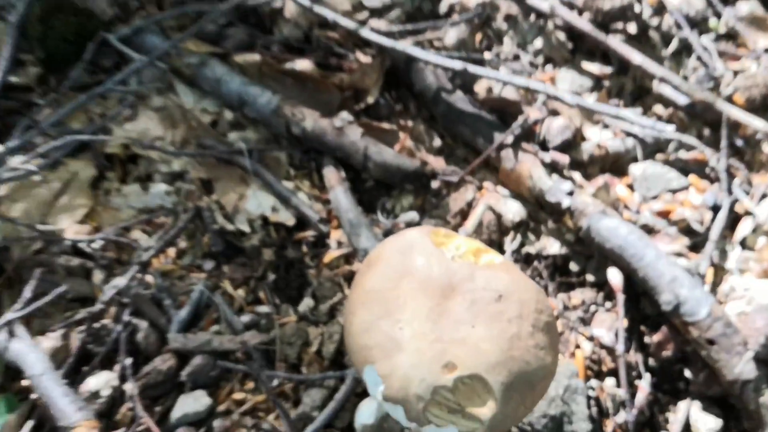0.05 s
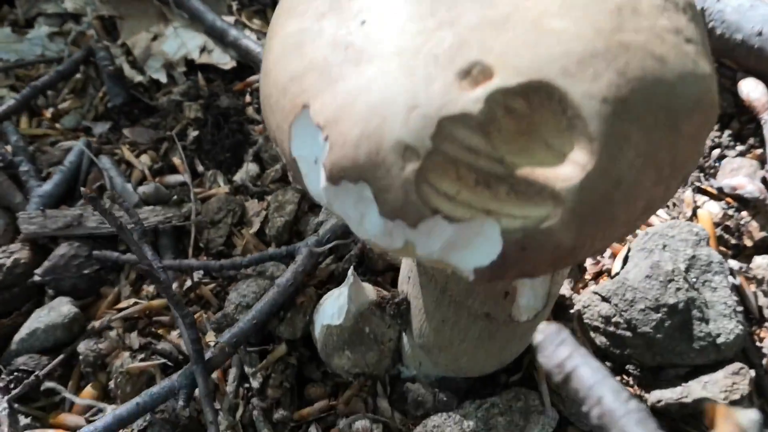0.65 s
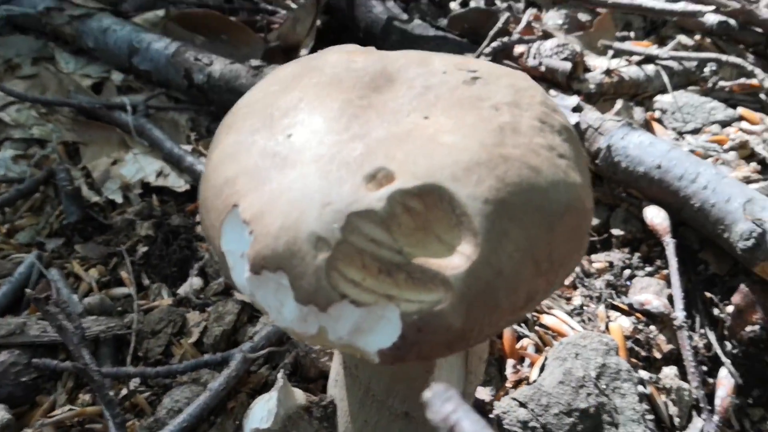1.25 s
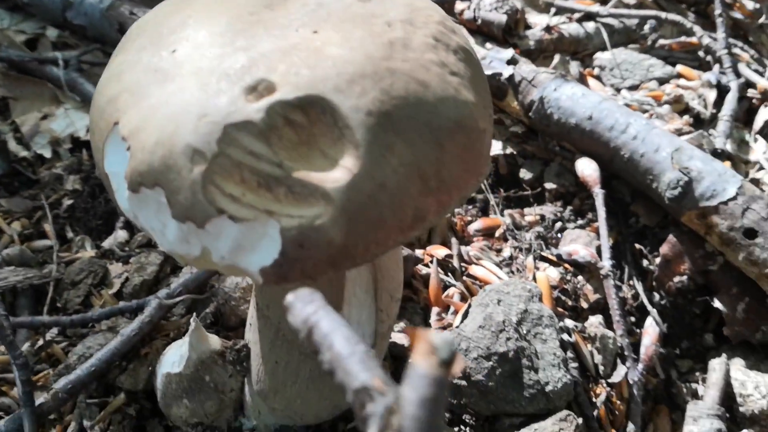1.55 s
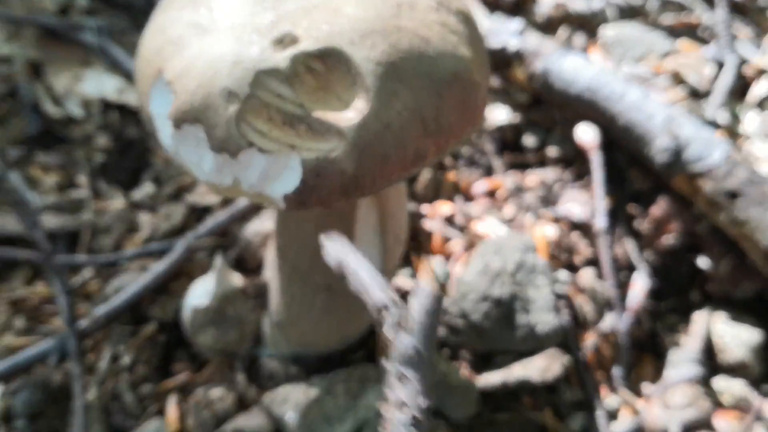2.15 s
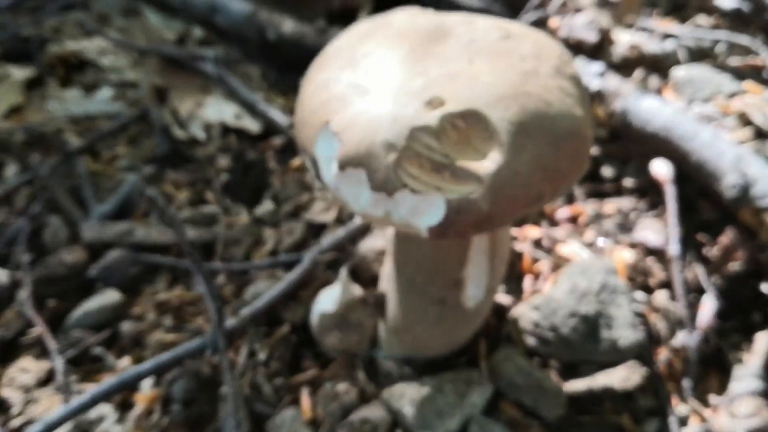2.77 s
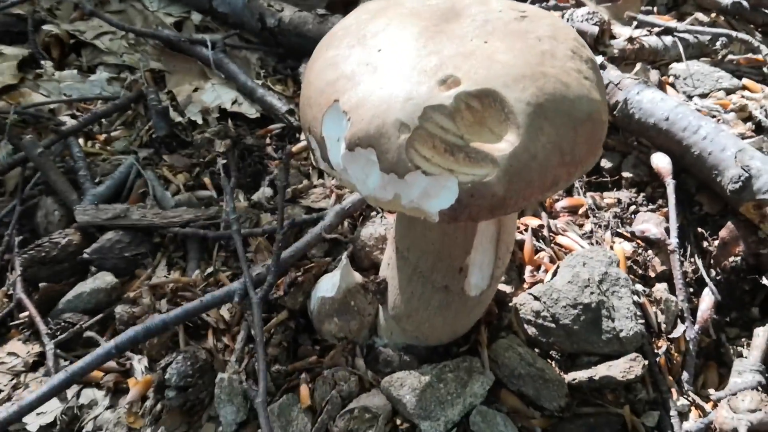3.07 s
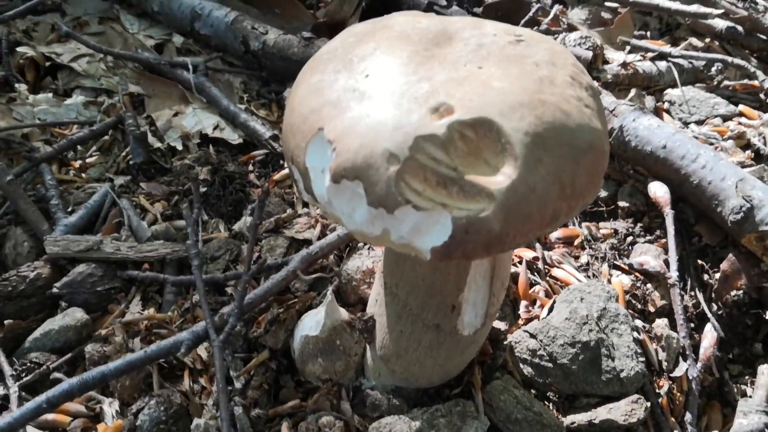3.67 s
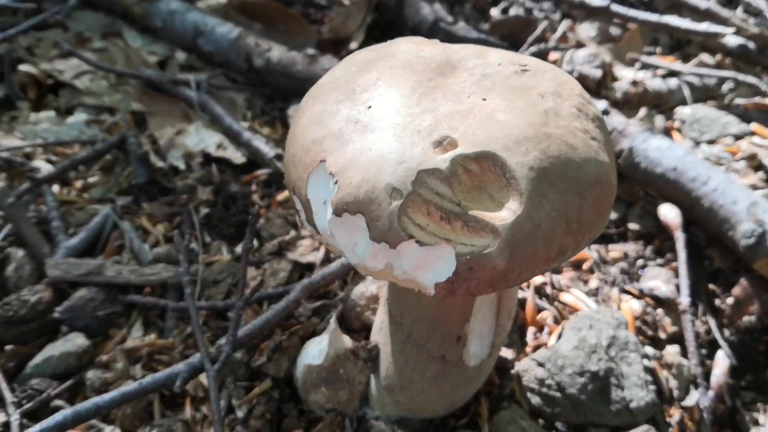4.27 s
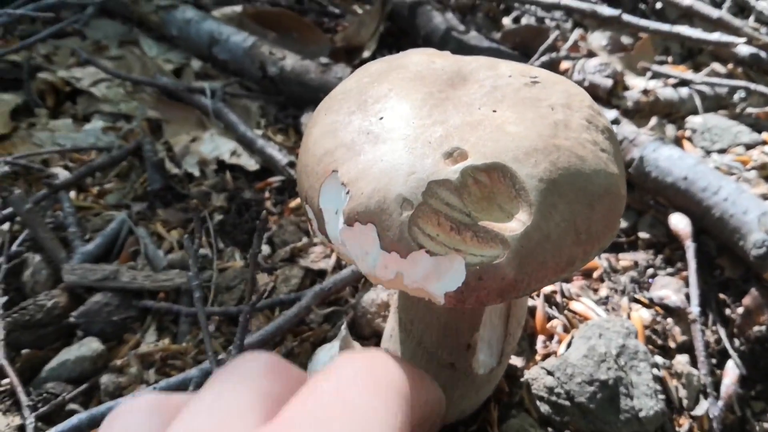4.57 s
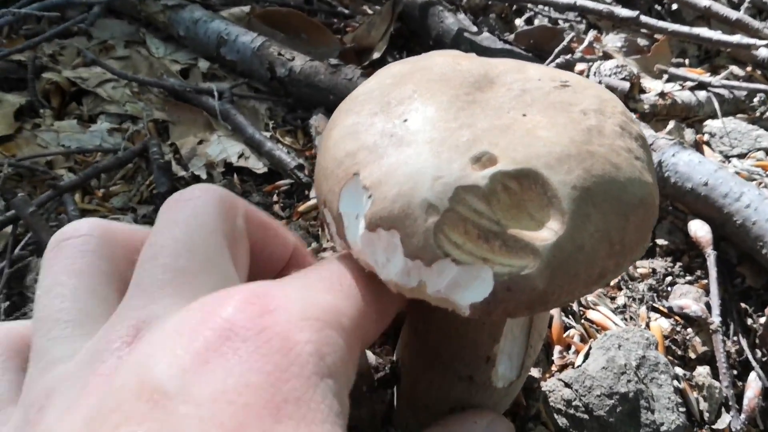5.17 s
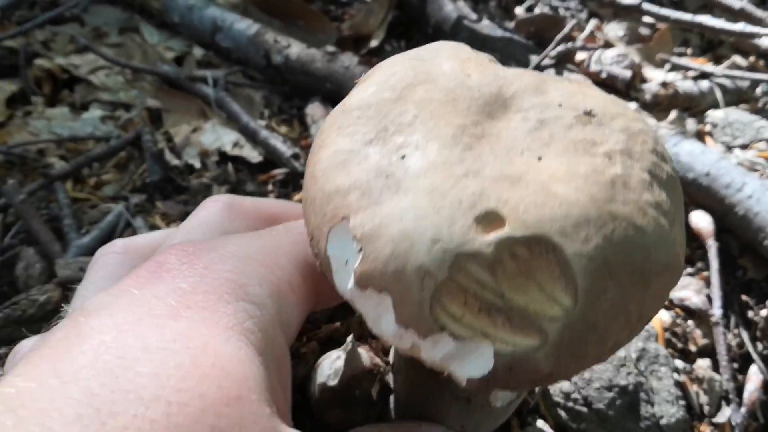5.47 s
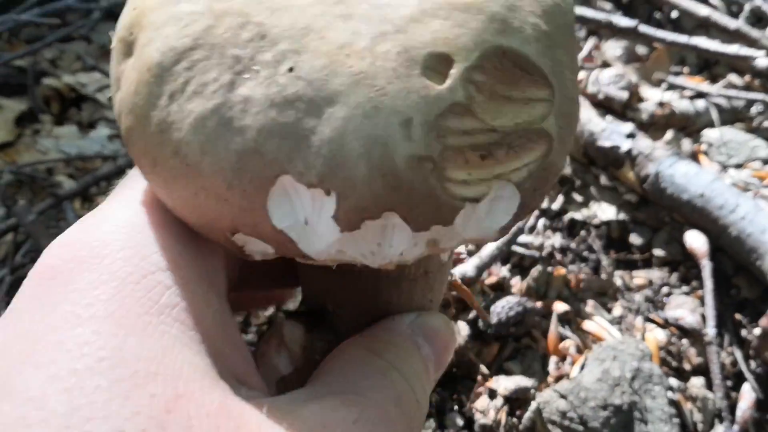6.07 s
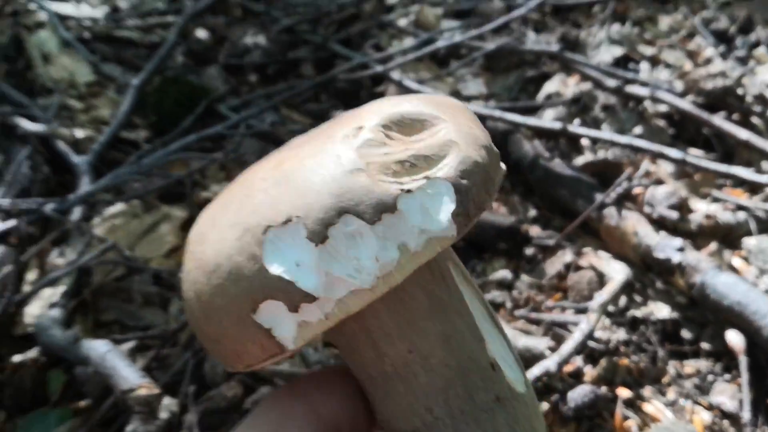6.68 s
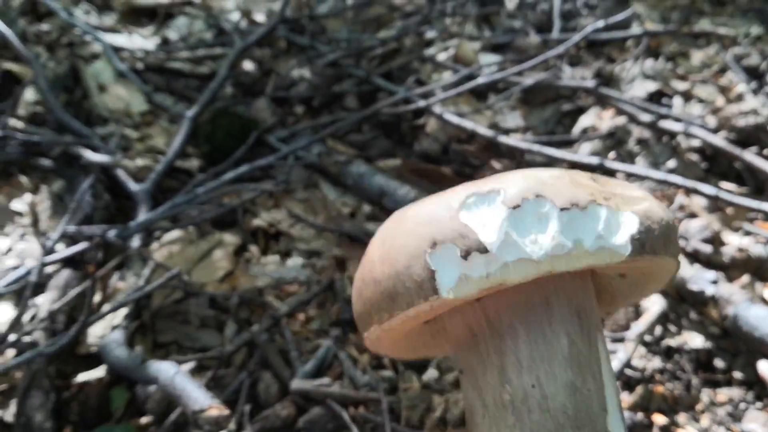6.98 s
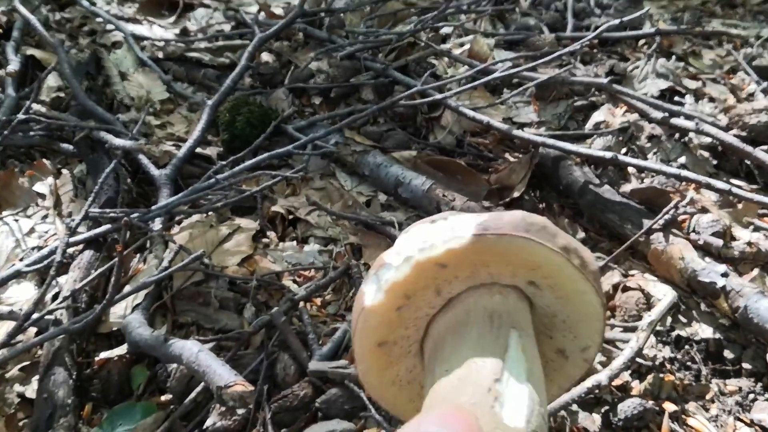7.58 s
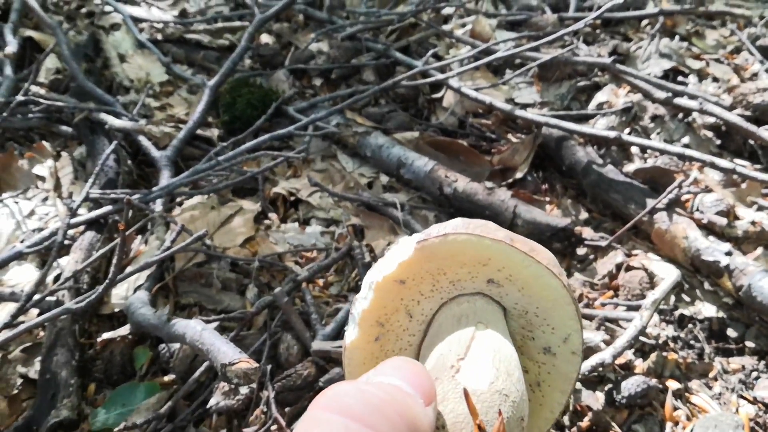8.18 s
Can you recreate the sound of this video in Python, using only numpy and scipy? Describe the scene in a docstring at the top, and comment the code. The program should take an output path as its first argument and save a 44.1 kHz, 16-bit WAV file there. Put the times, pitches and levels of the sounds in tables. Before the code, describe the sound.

A loud, close crunch of dry twigs and dead leaves starts at once and lasts until about 0.6 seconds, full of sharp snaps and dull soil thuds as someone shifts their weight. It dies down, with a brief cluster of snaps on the left at 1.1 seconds, then a lull with tiny ticks. From about 2.6 seconds a brighter, leafy crackle builds slightly to the left, loudest between 2.8 and 3.4 seconds, with many wooden snaps and one soft thud. A smaller crunch follows at 3.8 seconds, then near quiet. From 5 to 6.2 seconds come softer crunches, snaps and low thuds as a mushroom is pulled from the ground. These thin out to stray ticks, with single small snaps near 6.6 and 7.2 seconds and very faint rustling until about 8.5 seconds. The faint, steady rush of a still wood lies behind throughout.

```python
"""Someone leans over a mushroom on a dry forest floor, moves a stick, shifts their weight and pulls it up.
First comes a loud crunch: twigs and dead leaves fail by brittle fracture, and the damped soil thuds.
After a lull a brighter crackle builds near 3 s, with snaps that ring the modes of wood and splinters.
Softer crunches and thuds follow from 5 to 6 s and thin out to stray ticks.
All of it is close by; throughout, the faint rush of a still wood lies behind."""
import sys
import numpy as np
from scipy import signal
from scipy.fft import rfft, irfft, next_fast_len
from scipy.io import wavfile
from scipy.ndimage import map_coordinates

SR = 44100
rng = np.random.default_rng(int(sys.argv[2]) if len(sys.argv) > 2 else 0)


def generate_wav(sig):
    """Save sig (samples, or channels by samples) to the path in sys.argv[1] as 16-bit PCM at SR."""
    pcm = np.round(np.clip(np.atleast_2d(sig).T, -1, 1) * 32767).astype(np.int16)
    wavfile.write(sys.argv[1], SR, pcm)


N = 367516

# Pushes of a foot, stick or hand: t/s at full weight, rise/s, hold/s, release/s,
# relative twig, leaf and soil level/dB, left-right level/dB
PRESSES = [(.012, 0.036, .06, 0.089, -40.5, -42, -45.5, 3),
           (0.233, 0.2198, .115, .15, -44.5, -44.5, -49, -1), (.47, 0.0471, .02, 0.041, -49, -45.5, -46, 2),
           (.515, 0.0284, .047, 0.0645, -44, -48, -46.5, -.5),
           (.645, 0.0449, .025, 0.1884, -60.5, -62.5, -63, 0),
           (0.802, .015, .004, 0.061, -64.5, -69, -64, 2), (.93, 0.0312, .005, 0.081, -67, -73, -62, -2.5),
           (1.11, 0.0169, .075, .025, -54.5, -64.5, -64.5, 8),
           (1.627, 0.018, .005, .06, -70.5, -76.5, -66.5, -4),
           (2.29, 0.1274, .03, .1, -70, -68.5, -65.5, -0.5),
           (2.38, 0.0521, .18, 0.13, -71.5, -68, -85.5, 12),
           (2.615, .06, .035, .06, -61.5, -55.5, -77.5, 10.5),
           (2.745, 0.1049, .02, .08, -59, -53.5, -67.5, 7.5),
           (2.815, 0.02694, .025, .15, -48, -46, -54.5, 4.5), (2.963, 0.041, .01, .1, -47.5, -44, -53.5, 5),
           (3.025, 0.046, .09, 0.1003, -43, -38, -52.5, 6.5),
           (3.205, 0.0967, .045, 0.0778, -41, -35.5, -48.5, 7),
           (3.362, .05, 0.0055, .09, -48.5, -46.5, -54, 4.5),
           (3.469, 0.13, .02, .19, -64.5, -60.5, -61.5, 2.5), (3.636, .02, 0.0055, .25, -70, -68, -74, 1.5),
           (3.792, .02, .04, 0.147, -54.5, -50.5, -56.5, 4),
           (3.89, 0.0378, .01, 0.1393, -62, -62.5, -58.5, -0.5),
           (4.07, .04, .02, .03, -80, -73, -81.5, 1.5), (4.52, 0.0345, .03, .2, -76, -73.5, -83, 6),
           (4.692, 0.0327, 0.0066, .15, -68, -68, -88, 3.5), (4.83, 0.163, .035, .03, -68, -63, -69, 14.5),
           (5.065, 0.0852, 0.0096, 0.078, -64, -60, -75.5, 7), (5.15, .02, .04, .1, -57.5, -59.5, -66.5, 4),
           (5.24, .06, .05, 0.16, -53, -54.5, -55.5, 4.5), (5.44, 0.0674, .025, .1, -64.5, -67, -63, 1.5),
           (5.525, 0.0324, .015, .15, -63.5, -68.5, -68.5, 2.5),
           (5.745, 0.0502, .04, .12, -61.5, -66.5, -71.5, 3),
           (5.932, 0.0129, .04, .1, -58.5, -62.5, -70, 1.5), (6.01, .04, .02, .05, -66, -62, -65, 4),
           (6.152, 0.0305, .012, .08, -63, -60, -64, 0.5), (6.79, 0.1916, .06, .25, -73, -76, -91.5, 0.5),
           (7.45, 0.213, .06, .05, -74, -77.5, -92, 0.5)]
REST_DB = (-81, -85.5, -75)  # twigs, leaves and soil settling under a crouching person


def loading():
    """Incoherent sources add in power: gives the twig, leaf, soil and left-right levels of all presses."""
    t = np.arange(0, N, 32) / SR
    power = amp(REST_DB)[:, None] ** 2 * np.ones(len(t))
    side = np.zeros(len(t))
    for start, rise, hold, release, twig_db, leaf_db, soil_db, pan_db in PRESSES:
        away = np.maximum((start - t) / rise, (t - start - hold) / release)
        fade_db = 20 * np.maximum(away, 0)
        press = amp(np.array([[twig_db], [leaf_db], [soil_db]]) - fade_db) ** 2
        power += press
        side += pan_db * press[:2].sum(0)
    levels = [*(10 * np.log10(power)), side / power[:2].sum(0)]
    return [np.interp(np.arange(N) / SR, t, level) for level in levels]


def litter(twig_db, leaf_db, soil_db, pan_db):
    """Superposition: one unsteady load crunches twigs, crumples leaves and compresses the soil."""
    falter_db = 0.9286 * wobble(30)
    twigs = twig_crunch(twig_db + falter_db, twig_db - leaf_db, pan_db)
    leaves = leaf_crackle(leaf_db + falter_db, pan_db)
    soil = soil_rumble(soil_db)
    return scattered(twigs + leaves, t60=.015, wet_db=-3, count=5) + soil


# Radiation response of twigs: f/Hz, level/dB
TWIG_RESPONSE = [(200, -23.5), (480, -12), (750, -8), (1050, -4), (1400, -6), (1750, -2), (2200, -1),
                 (2700, 0), (3400, -3), (4200, -5.5), (6500, -38)]


def twig_crunch(level_db, over_leaves_db, pan_db):
    """Thicker bodies radiate lower: where twigs outweigh leaves they are thicker and sound fuller."""
    twigs = crackle(level_db, pan_db - 1, TWIG_RESPONSE,
                    pitch_hz=2117, rate=2600, cycles=1.1, size_db=4, clump_db=3)
    body = filtered(twigs, lambda hz: rolloff(hz, edge_hz=1229.5))
    body_db = 0.46 * np.clip(over_leaves_db + 2, -4, 4)
    return amp(-0.64) * (twigs + body * (amp(body_db) - 1))


# Radiation response of dead leaves: f/Hz, level/dB
LEAF_RESPONSE = [(2000, -28.5), (3400, -12), (4400, -3), (5200, 0), (5900, -1.5), (6600, -4.5), (7600, -3),
                 (8800, -9.5), (10500, -15), (12500, -17.5), (15000, -16.5)]


def leaf_crackle(level_db, pan_db):
    """Short waves are shadowed: leaves on the open left keep their top octave, the others lose it."""
    leaves = crackle(level_db, pan_db + 0.5, LEAF_RESPONSE,
                     pitch_hz=6460, rate=2400, cycles=0.93, size_db=3.5, clump_db=4)
    top = filtered(leaves, lambda hz: 1 - rolloff(hz, edge_hz=10160))
    top_db = .55 * np.clip(pan_db - 2.5, -7, 7)
    return amp(-0.63) * (leaves + top * (amp(top_db) - 1))


def crackle(level_db, pan_db, response, pitch_hz, rate, cycles, size_db, clump_db):
    """Acoustic emission: tiny fractures ring a few cycles each, denser and more uneven under load."""
    unevenness = np.clip(1 + .025 * (level_db + 45), .45, 1.15)
    per_second = np.clip(rate * amp(.05 * (level_db + 44.5)), 200, 12000)
    clumps = lognormal(clump_db * unevenness, wobble(140))
    at = np.flatnonzero(rng.random(N) < per_second * clumps / SR)
    pitch, place, phase, strength = rng.standard_normal((len(at), 4)).T
    size = lognormal(size_db * unevenness[at], np.minimum(strength, 2.8)) / np.sqrt(per_second[at])
    grain_hz = np.clip(pitch_hz * np.exp(.55 * pitch), 400, 15000)[:, None]
    age = np.arange(160)  # samples
    turns = grain_hz * age / SR
    ring = np.sin(2 * np.pi * turns + phase[:, None]) * np.exp(-turns / cycles)
    grains = size[:, None] * np.sqrt(grain_hz) * ring
    pair = np.zeros((2, N))
    for channel, gain, delay in zip(pair, *ports(pan_db[at] + 3 * place)):
        starts = at + np.round(delay * SR).astype(int)
        channel += np.bincount((starts[:, None] + age).ravel(), (grains * gain[:, None]).ravel(), N)[:N]
    return amp(level_db) * unit(filtered(pair, lambda hz: amp(along(response, hz))))


# The loudest breaks, in relative levels: t/s, wood level/dB, wood f/Hz, wood Q,
# splinter level/dB, splinter f/Hz, chatter level/dB re the crack, left-right level/dB
TWIG_BREAKS = [(0.013, -26.5, 2750, 0.376, -28, 4410, -2.5, 0.5),
               (0.0343, -28, 3302, 7.7, -45.5, 4650, 13.5, -2),
               (0.0864, -47, 2330, 1, -36, 7150, -9.5, -1.5),
               (0.1628, -42, 2480, 2.9, -42, 4720, -5.5, 3.5),
               (.1898, -32.5, 3750, 2.9, -32, 7970, -23.5, 9),
               (0.2041, -28, 2230, 1.54, -45, 4570, -9.5, -0.5),
               (0.2247, -37.5, 1880, 4.3, -34.5, 5850, 4.5, 1.5),
               (0.2483, -28, 3270, 3.7, -35.5, 5140, -0.5, 0.5),
               (0.3095, -31, 2820, 2.6, -26.5, 5930, -6.5, 4.5),
               (.343, -31.5, 2600, 2.76, -35, 5350, 4.5, -2), (0.3839, -37, 3400, 2.7, -34.5, 8240, -1, 2),
               (0.3875, -31.5, 2888, 2.421, -27, 8400, -28, 3),
               (.444, -43.5, 2440, 2.12, -49.5, 6800, -12, 1),
               (0.4652, -38.5, 1585, 4.3, -42.5, 5500, 12, 2),
               (0.5002, -28.5, 1965, 1.54, -37.5, 4380, 12, 0.5),
               (.515, -31, 1870, 1.2, -36.5, 5360, -9, 0.5),
               (0.5449, -32.5, 1750, 0.74, -52, 5500, -8.5, 0.5),
               (0.6666, -45, 1870, 3, -51.5, 5860, 7.5, -1.5), (.71, -52.5, 1124, 16.7, -53, 4870, 3, 0.5),
               (1.0361, -55.5, 2090, 1.3, -82.5, 4760, 5.5, 6),
               (1.1064, -41.5, 2670, 3.16, -69, 5510, 4.5, 13),
               (1.1147, -40.5, 1730, 1.8, -63, 5730, 6, 18.5),
               (1.1256, -43, 1870, 3.5, -48.5, 5530, -15, 19.5),
               (1.1701, -46.5, 1400, 2.77, -39, 5297, -20, 2.5),
               (2.6431, -43, 2263, 7.1, -39, 6210, -1.5, 14), (2.8049, -32, 2330, 3, -23.5, 6830, 2, 7),
               (2.8271, -36.5, 2237, 6.5, -33, 5830, 14, 6.5), (2.8519, -34, 2114, 12, -40, 5400, -3, 5.5),
               (3.04, -38.5, 2100, 3.76, -29, 5996, 0.5, 0.5),
               (3.0433, -43, 2070, 2.5, -26.5, 6100, -8, 11),
               (3.0673, -37, 2280, 3.2, -26.5, 6050, 2.5, 6.5),
               (3.074, -32.5, 2310, 1.87, -26, 6150, -4.5, 7.5),
               (3.1088, -35.5, 2100, 4.4, -28.5, 7260, -1, 5),
               (3.1582, -31.5, 2210, 4.2, -32.5, 6680, 15.5, 3),
               (3.2068, -30, 2585, 3.8, -34.5, 5020, -6.5, 12.5),
               (3.216, -43, 2240, 2.52, -33, 7300, -8.5, 4.5),
               (3.2561, -33, 3233, 2.96, -29.5, 4988, 5, 10.5),
               (3.323, -43.5, 2110, 2.44, -33, 4820, 9.5, 8),
               (3.3422, -56, 3750, 2.4, -35.5, 4980, 15, 10.5),
               (3.3667, -37.5, 1107, 12.94, -34.5, 5580, -0.5, -0.5),
               (3.4049, -51.5, 3620, 2.45, -37.5, 5400, 16.5, 7),
               (3.5205, -53.5, 2040, 2.7, -39.5, 5470, 4, 3.5), (3.784, -45.5, 2842, 5.7, -42, 5140, 9, 3),
               (4.0017, -54.5, 3730, 3.58, -54.5, 7660, 6.5, 4.5),
               (4.555, -66.5, 2994, 2.9, -57, 4821, -6, 3), (5.072, -51, 1003, 1.8, -44.5, 4440, 0.5, 12.5),
               (5.1577, -58.5, 3793, 2.32, -46, 5913, -3.5, 18.5),
               (5.1685, -44.5, 2527, 2.08, -50, 6929, -5.5, 16), (5.252, -60, 2617, 2.42, -39, 4930, -4, 0),
               (5.421, -55.5, 1420, 2.43, -51, 4932, 7, 0.5),
               (5.4397, -52.5, 1465, 1.86, -43.5, 5110, -4, 1.5),
               (5.5062, -48, 2490, 1.4, -69.5, 4360, -1.5, 16.5), (5.521, -53, 2260, 0.74, -54, 5850, 1, 7),
               (5.6746, -47, 2100, 2.44, -74, 4410, 7.5, 0.5), (5.7104, -43, 1657, 2.88, -56.5, 4270, 3, 1),
               (5.7808, -43.5, 1598, 0.71, -55.5, 4700, 20.5, 0),
               (5.9198, -43, 1470, 2.27, -49, 4210, 0, 2),
               (5.941, -62.5, 1825, 1.96, -51.5, 6150, -20.5, 10),
               (6.15, -47.5, 2330, 4.1, -44.5, 4394, 5.5, -0.5),
               (6.6029, -45.5, 2190, 3.5, -43.5, 5900, -13, 1.5),
               (6.7429, -58.5, 2170, 2.08, -53, 7179, -16.5, 3.5),
               (7.1525, -47.5, 2459, 3.33, -43.5, 6264, 9.5, 0)]


def snaps():
    """Sudden release of strain excites two modes of a twig: low in its wood, high in its splinters."""
    out = np.zeros((2, N + SR))
    for start, wood_db, wood_hz, wood_q, splinter_db, splinter_hz, chatter_db, pan_db in TWIG_BREAKS:
        wood = fracture(wood_hz, pan_db - 1, chatter_db, q=wood_q, crack_t60=0.0023, chatter_t60=0.0245)
        splinter = fracture(splinter_hz, pan_db - .5, chatter_db,
                            q=4.4, crack_t60=0.00148, chatter_t60=0.02)
        out[:, round(start * SR):][:, :wood.shape[1]] += amp(wood_db) * wood + amp(splinter_db) * splinter
    return out[:, :N]


def ticks(leaf_db, pan_db, full_load_per_s=15):
    """A Poisson process: small stalks give way, each at its own pitch, more often under load."""
    out = np.zeros((2, N + SR))
    load = np.clip((leaf_db - REST_DB[1]) / 15.5, .04, 1)
    starts = np.flatnonzero(rng.random(N) < full_load_per_s * load / SR)
    draws = np.clip(rng.standard_normal((len(starts), 3)), -2, 2)
    for at, (size, pitch, place) in zip(starts, draws):
        stalk_hz = 4780 * 2 ** (.6 * pitch)
        tick = fracture(stalk_hz, pan_db[at] + 4 * place,
                        chatter_db=-8, q=3.4, crack_t60=.002, chatter_t60=0.018)
        out[:, at:][:, :tick.shape[1]] += amp(leaf_db[at] + 1.5 + 2 * size) * tick
    return out[:, :N]


def fracture(mode_hz, pan_db, chatter_db, q, crack_t60, chatter_t60):
    """Impulsive excitation: a sharp crack and the chatter of torn fibres ring one mode."""
    t = np.arange(2048) / SR
    crack = rng.standard_normal(len(t)) * envelope(t, crack_t60, rise_s=0.000323)
    chatter = rng.standard_normal((2, len(t))) * envelope(t, chatter_t60, rise_s=.0008)
    gain, delay = ports(pan_db)
    # a small piece radiates little below its mode, and its softness damps what lies above
    ring = lambda hz: resonance(hz, mode_hz, q) * resonance(hz, mode_hz * 0.71, q=0.46)
    pair = unit(filtered(crack, ring)) + amp(chatter_db) * unit(filtered(chatter, ring))
    pair = np.array([np.pad(side, (round(lag * SR), 0))[:len(t)] for side, lag in zip(pair, delay)])
    return gain[:, None] * unit(pair) * np.sqrt(.003 * SR / len(t))  # the energy of 3 ms at rms 1


# Soft impacts on the soil: t/s, level/dB, f/Hz, t60/s
SOIL_IMPACTS = [(0.039, -36, 72.2, 0.057), (.163, -43.5, 275.5, 0.062), (.482, -24.5, 180, 0.0125),
                (.55, -30.5, 308, 0.021), (0.561, -45, 65, 0.089), (.734, -47, 253, 0.0191),
                (.809, -53, 174, 0.0152), (1.026, -28, 173, 0.00567), (3.186, -35.5, 148, .028),
                (5.322, -48, 146, 0.124), (5.415, -52, 144.5, 0.0814)]


def thuds():
    """A damped oscillator: soft ground answers each impact with a dull, quickly dying tone."""
    out, t = np.zeros(N + SR), np.arange(SR // 8) / SR
    for start, level_db, hz, t60 in SOIL_IMPACTS:
        thud = np.sin(2 * np.pi * hz * t) * envelope(t, t60, rise_s=0.0017)
        out[round(start * SR):][:len(t)] += amp(level_db) * thud
    return out[:N]


# Spectral density of pressed soil: f/Hz, relative level/dB
SOIL_SPECTRUM = [(20, -7.5), (45, -15), (70, -0.5), (150, 0.5), (280, -1), (400, -6), (600, -13.5),
                 (900, -9.5), (1600, -34.5)]


def soil_rumble(level_db):
    """Amplitude modulation: the low noise of pressed soil follows the load."""
    return amp(level_db - 4) * diffuse(SOIL_SPECTRUM)


# Imbalance that the camera body causes between its microphone ports: f/Hz, left-right level/dB
BODY_SHADOW = [(200, -1), (500, 2), (1000, 1.5), (2000, 0), (4000, -3), (6000, -1.5), (8500, 4), (12000, 1)]


def shadowed(pair):
    """Diffraction round an obstacle favours one port or the other, depending on frequency."""
    return filtered(pair, lambda hz: ports(along(BODY_SHADOW, hz))[0])


def scattered(x, t60, wet_db, count):
    """Multipath scattering adds echoes off stones, sticks and trunks; the paths change as things move."""
    t = np.arange(int(t60 * SR) + 2) / SR
    tails = rng.standard_normal((count, 2, len(t))) * amp(-60 * t / t60)
    tails /= np.linalg.norm(tails, axis=-1, keepdims=True)
    weights = np.array([wobble(12) for _ in tails])[:, None]
    echoes = signal.oaconvolve(x[None], tails, axes=-1)[..., :N]
    return x + amp(wet_db) * (echoes * weights / np.linalg.norm(weights, axis=0)).sum(0)


# Spectral density of the still wood: f/Hz, relative level/dB
AIR_SPECTRUM = [(15, -38), (25, -3), (178, -3.5), (233, -7), (297, -10.5), (349, -13.5), (614, -20),
                (684, -19.5), (1080, -16.5), (1950, -13.5), (2490, -16), (5730, -23.5), (6380, -24.5),
                (7500, -29), (15500, -35)]


def still_air(level_db=-70):
    """Ambient noise: a faint diffuse rush whose level barely wavers."""
    return amp(level_db + 0.17 * wobble(9)) * diffuse(AIR_SPECTRUM)


# Likeness of diffuse sound at the two ports: f/Hz, correlation coefficient
COHERENCE = [(50, 0.95), (150, .95), (300, 0.49), (600, 0), (1500, 0.065)]


def diffuse(spectrum):
    """Spatial coherence: stereo noise of rms 1, alike in the bass and unrelated in the treble."""
    def mid_side_gains(hz):
        angle = np.arccos(along(COHERENCE, hz)) / 2
        return amp(along(spectrum, hz)) * [np.cos(angle), np.sin(angle)]
    mid, side = filtered(rng.standard_normal((2, N)), mid_side_gains)
    return unit(np.array([mid + side, mid - side]))


def ports(pan_db):
    """Path difference: gain and delay/s at each port; the nearer one is louder and hears first."""
    gain = amp(np.array([pan_db, -pan_db]) / 2)
    lag = .00052 * np.clip(pan_db / 4, -1, 1)
    return gain / np.sqrt(np.mean(gain ** 2, axis=0)), np.maximum([-lag, lag], 0)


def resonance(hz, centre, q):
    """Causal response of one damped mode."""
    return 1j * hz * centre / q / (centre ** 2 - hz ** 2 + 1j * hz * centre / q)


def rolloff(hz, edge_hz):
    """Gain of a smooth low-pass."""
    return 1 / (1 + (hz / edge_hz) ** 6)


def filtered(x, response):
    """Linear filtering: the spectrum of x times a response of frequency."""
    n = x.shape[-1]
    padded = next_fast_len(n + min(n, SR // 2))
    return irfft(rfft(x, padded) * response(np.fft.rfftfreq(padded, 1 / SR)), padded)[..., :n]


def envelope(t, t60, rise_s):
    """Exponential rise and decay."""
    return amp(-60 * t / t60) * (1 - np.exp(-t / rise_s))


def wobble(rate):
    """A smooth random curve, rate knots a second."""
    at = np.arange(0, N + 16, 16)
    knots = rng.standard_normal(int(N * rate / SR) + 4)
    return np.interp(np.arange(N), at, map_coordinates(knots, [at * rate / SR]))


def lognormal(spread_db, draw):
    """Turns a normal draw into a factor whose mean square is 1 at any spread."""
    return amp(spread_db * draw) * np.exp(-np.log(amp(spread_db)) ** 2)


def along(points, hz):
    """Interpolates (f/Hz, value) points on a log axis."""
    knot_hz, values = np.transpose(points)
    return np.interp(np.log(hz + 1), np.log(knot_hz + 1), values)


def amp(db):
    """Decibels to gain."""
    return 10 ** (np.asarray(db) / 20)


def unit(x):
    """Scaled to rms 1."""
    return x / np.sqrt(np.mean(x ** 2) + 1e-20)


def scene():
    """Direct, scattered and ambient fields add: the litter close by, the trees' answer, the still air."""
    twig_db, leaf_db, soil_db, pan_db = loading()
    breaks = snaps() + ticks(leaf_db, pan_db)
    breaks = amp(-1.39) * filtered(breaks, lambda hz: rolloff(hz, edge_hz=14700))
    direct = shadowed(litter(twig_db, leaf_db, soil_db, pan_db) + breaks)
    return scattered(direct, t60=0.18, wet_db=-24.5, count=2) + thuds() + still_air()


def record(dry):
    """Band limiting: a steep low-pass removes the highest treble."""
    edge_hz = 15500
    return filtered(dry, lambda hz: 1 / np.sqrt(1 + (hz / edge_hz) ** 140))


dry = scene()
out = record(dry)
generate_wav(out)
```